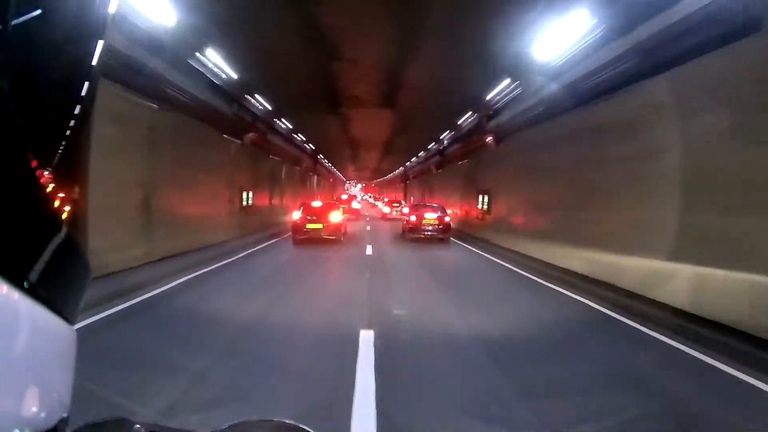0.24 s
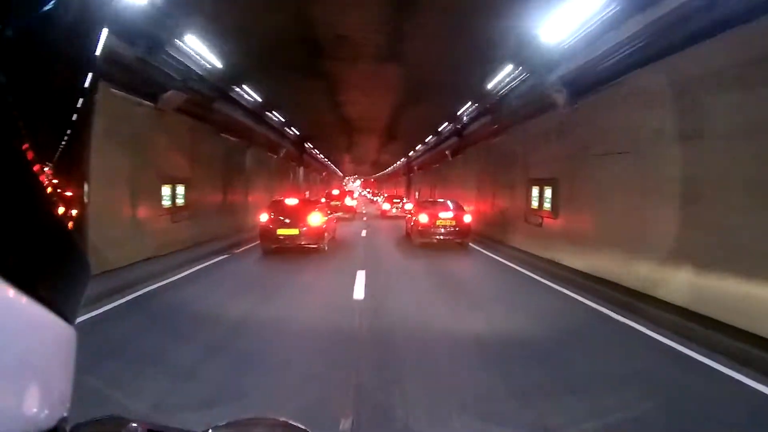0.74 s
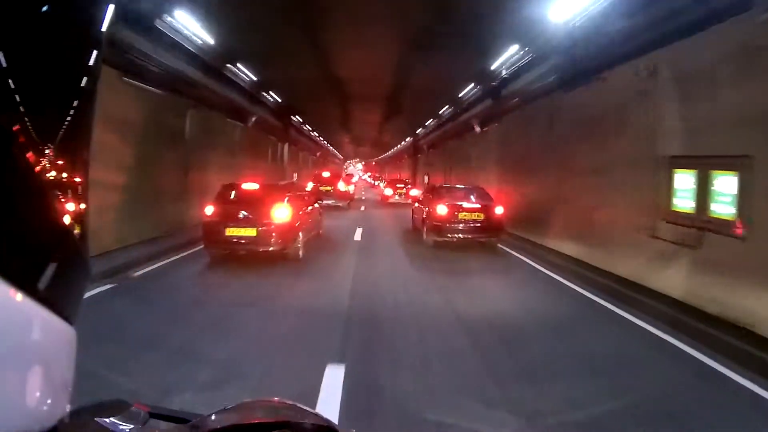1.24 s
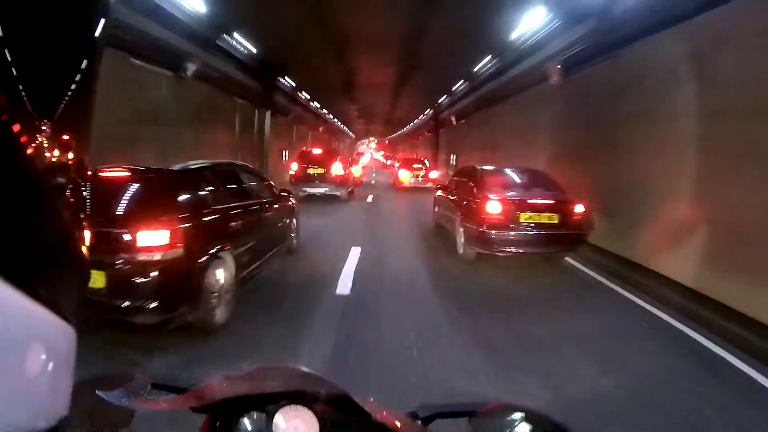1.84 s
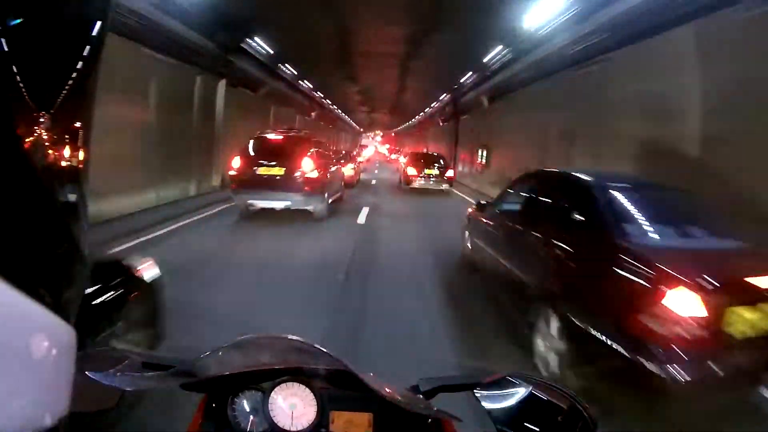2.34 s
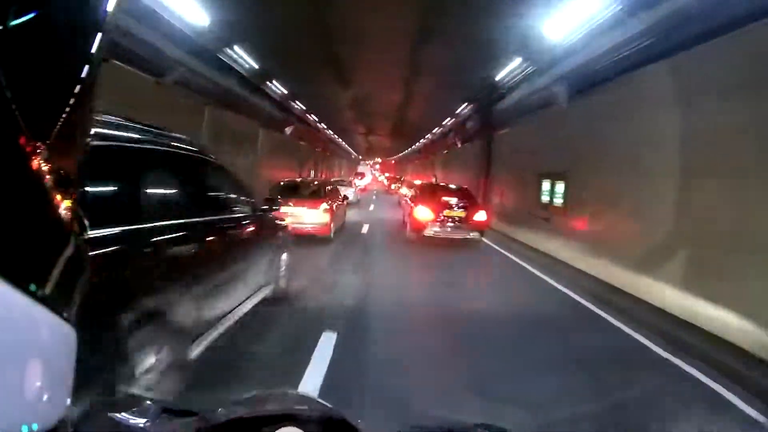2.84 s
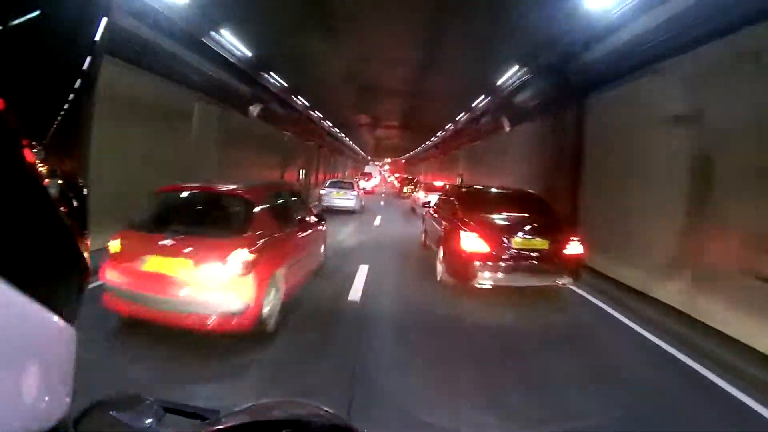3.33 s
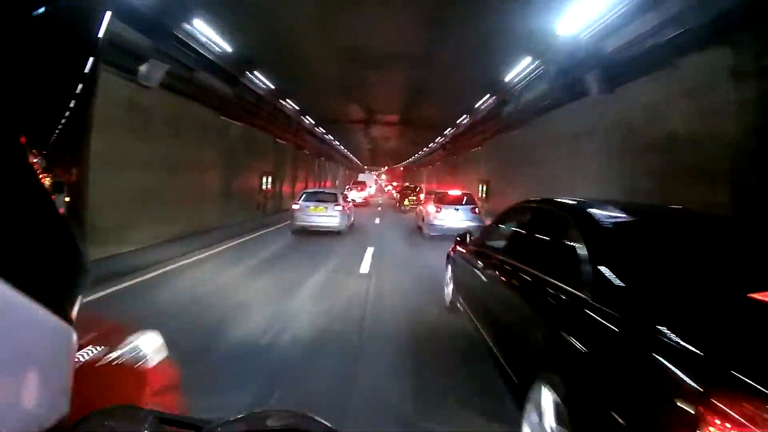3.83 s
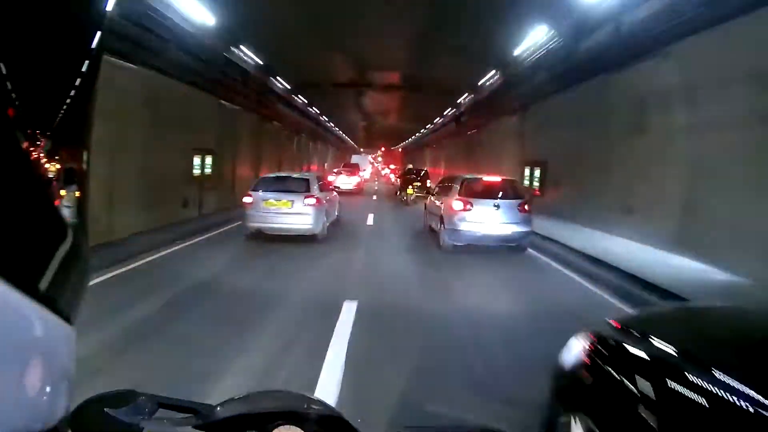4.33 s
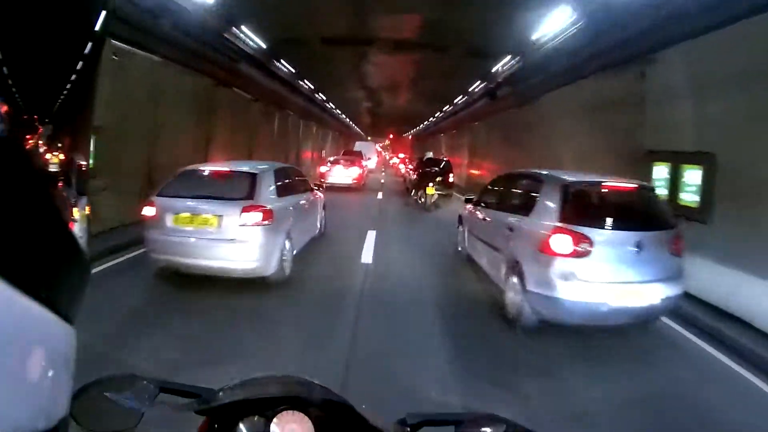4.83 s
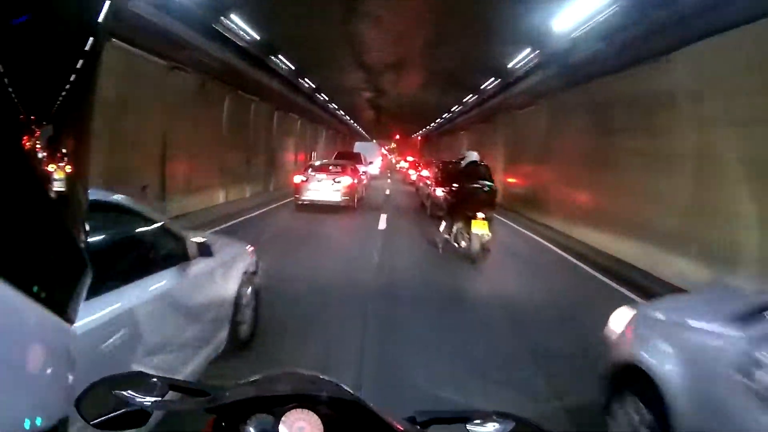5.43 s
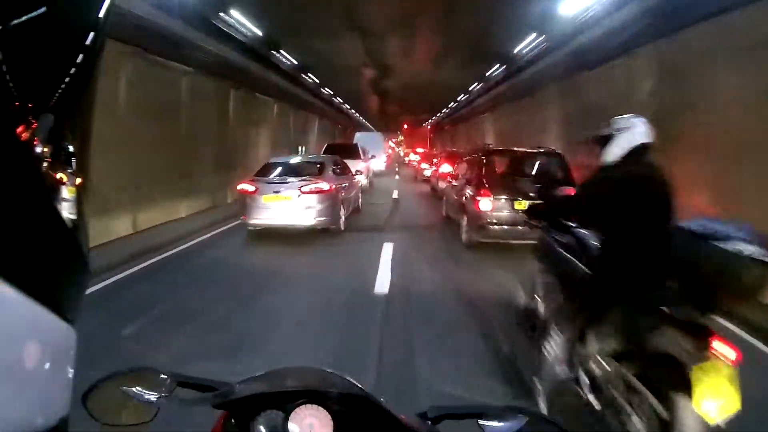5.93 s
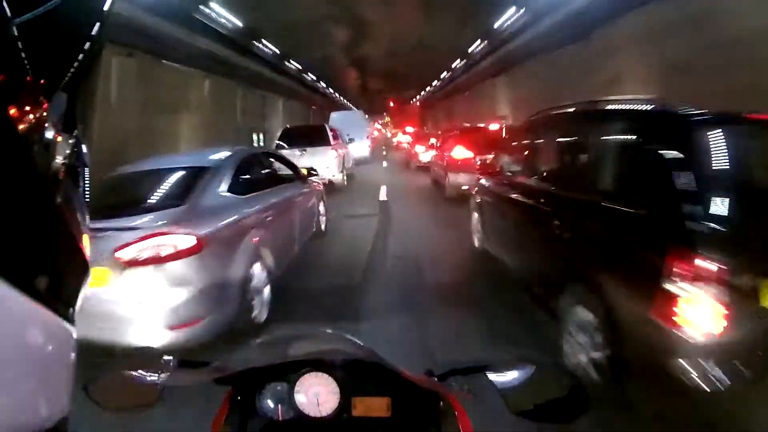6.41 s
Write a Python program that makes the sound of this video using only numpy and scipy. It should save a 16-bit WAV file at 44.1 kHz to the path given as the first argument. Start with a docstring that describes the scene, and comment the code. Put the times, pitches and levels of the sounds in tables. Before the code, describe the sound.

Inside a concrete road tunnel, a motorcycle engine booms and slowly drops in pitch, heard close from the saddle. It accelerates briefly with a rough growl, lets out a few exhaust pops, and winds down for the rest of the time. Around it is a steady roar of traffic, with whooshes of tyre hiss as cars are passed. A thin, wandering whine and faint brake squeals sit underneath.

```python
"""Motorcycle in a road tunnel

A four-cylinder sport bike filters between slow cars, heard from the rider's seat. It coasts, takes one
burst of throttle, pops and burbles as the throttle shuts, and runs down again. The firings boom from the
tail pipe and ring the airbox; concrete walls smear the note. Around it traffic roars, tyres hiss past,
the chain hisses, a thin whine wanders and a brake squeals faintly, early on and again at the end."""
import sys
import numpy as np
from scipy import signal
from scipy.fft import rfft, irfft
from scipy.io import wavfile

SR = 44100
rng = np.random.default_rng(int(sys.argv[2]) if len(sys.argv) > 2 else 0)


def transcribe(signal):
    """Save signal, clipped to [-1, 1], as a 16-bit WAV file at the path in sys.argv[1]."""
    frames = np.atleast_2d(signal).T
    limited = np.clip(frames, -1, 1)
    pcm = np.round(limited * 32767).astype(np.int16)
    wavfile.write(sys.argv[1], SR, pcm)


N = 294147


def from_db(db):
    """Decibels to gain."""
    return 10 ** (np.asarray(db) / 20)


def rms_one(x):
    """Scale to unit power."""
    return x / np.sqrt(np.mean(x ** 2) + 1e-20)


def in_time(rows):
    """Each column of an automation table, sample by sample."""
    times, *columns = np.transpose(rows)
    return [np.interp(np.arange(N) / SR, times, column) for column in columns]


def drift(rate_hz):
    """Smooth random wander with spread 1."""
    hop, settle = 40, 2000
    pole = np.exp(-2 * np.pi * rate_hz * hop / SR)
    noise = rng.standard_normal(N // hop + settle + 2)
    slow = signal.lfilter([1], [1, -2 * pole, pole * pole], noise)[settle:]
    return np.interp(np.arange(N) / hop, np.arange(len(slow)), rms_one(slow))


def swell(start_s, end_s, rise_s, fade_s):
    """Envelope: straight rise, hold, exponential fade; 0-1."""
    t = np.arange(N) / SR
    return np.clip((t - start_s) / rise_s, 0, 1) * np.exp(-np.maximum(t - end_s, 0) / fade_s)


def going_by(closest_s, half_s):
    """Pass-by envelope, 0-1: half gain at half_s either side of the closest point."""
    return 1 / (1 + ((np.arange(N) / SR - closest_s) / half_s) ** 2)


def coloured_noise(spectrum):
    """Noise through an EQ curve, rolled off beyond its ends; rms 1."""
    hz, level_db = np.transpose(spectrum)
    bins = np.maximum(np.arange(N // 2 + 1) * SR / N, 1)
    roll_off = 1 / np.sqrt((1 + (hz[0] / bins) ** 4) * (1 + (bins / hz[-1]) ** 4))
    gain = roll_off * from_db(np.interp(np.log(bins), np.log(hz), level_db))
    return rms_one(irfft(rfft(rng.standard_normal(N)) * gain, N))


def resonate(x, modes):
    """Parallel resonances with alternating polarity."""
    out = 0
    for k, (hz, width_hz, level_db) in enumerate(modes):
        r = np.exp(-np.pi * width_hz / SR)
        poles = [1, -2 * r * np.cos(2 * np.pi * hz / SR), r * r]
        ring = (1 - r * r) / 2 * signal.lfilter([1, 0, -1], poles, x)
        out += (-1) ** k * from_db(level_db) * ring
    return out


def band(x, low_hz, high_hz):
    """Second-order band-pass."""
    return signal.sosfilt(signal.butter(2, [low_hz, high_hz], "band", fs=SR, output="sos"), x)


def tunnel(x, wet_db, t60_s=3.3, predelay_s=.015):
    """Equal-power mix of direct sound and the long, dense tail between concrete walls."""
    t = np.arange(2 * SR) / SR
    tail = rng.standard_normal(len(t)) * from_db(-60 * t / t60_s) * (t > predelay_s)
    eased_in = x * np.minimum(np.arange(N) / (.01 * SR), 1)
    reverb = signal.fftconvolve(eased_in, tail / np.linalg.norm(tail))[:N]
    return (x + from_db(wet_db) * reverb) / np.hypot(1, from_db(wet_db))


def firings(cycles, cylinder_db, rough_db):
    """One click per firing, cylinder by cylinder; no two burns are alike."""
    at = np.flatnonzero(np.diff(np.floor(cycles)) > 0)
    clicks = np.zeros(N)
    clicks[at] = from_db(np.resize(cylinder_db, len(at)) + rough_db * rng.standard_normal(len(at)))
    return clicks


def partial(cycles, order, flutter):
    """One harmonic at a random phase; flutter roughens the tone without making it louder; rms 1."""
    wobble = (1 + flutter * (drift(15) + 1j * drift(23))) / np.sqrt(1 + 2 * flutter ** 2)
    return rms_one(np.real(wobble * np.exp(2j * np.pi * (order * cycles + rng.random()))))


# The revs: (time [s], firing rate [Hz])
REVS = [(0, 119.5), (.13, 119), (.3, 114.8), (.55, 111.3), (.8, 106.8), (1.2, 103.5), (1.45, 99),
        (1.66, 97), (1.8, 100.5), (2, 103.5), (2.1, 109), (2.22, 115.5), (2.4, 131.5), (2.52, 135),
        (2.8, 134.5), (3.05, 131.3), (3.5, 125.3), (4, 118.8), (4.5, 109.5), (4.8, 105), (5.2, 101.3),
        (5.55, 98.5), (5.9, 95.5), (6.25, 94), (6.67, 93.6)]

def firing_hz():
    """Firings per second as the engine runs down and picks up."""
    return in_time(REVS)[0]


def with_revs(level_db, db_per_octave, cruise_hz=110):
    """Gain that rides the revs and equals level_db at cruise."""
    return from_db(level_db + db_per_octave * np.log2(firing_hz() / cruise_hz))


def flow():
    """Intake turbulence grows steeply with the revs; 0-1."""
    return (firing_hz() / firing_hz().max()) ** 3


# Twists of the grip: (opens [s], shuts [s], opening [dB])
TWISTS = [(1.689, 2.486, 0.5), (6.215, 6.672, -13)]

def throttle():
    """How far the throttle is open: 0 shut, about 1 wide open."""
    return sum(from_db(db) * swell(opens, shuts, rise_s=.33, fade_s=.087) for opens, shuts, db in TWISTS)


def load():
    """How hard the engine works, about 0-1."""
    return throttle() * flow()


# Gusts behind a tall car: (time [s], half length [s], level [dB])
WAKE_GUSTS = [(2.82, .055, -38.5), (2.981, .03, -42.5)]

def wind(bed_db=-54):
    """Low, lumpy buffeting, strongest in the wake of a tall car."""
    gusts = sum(from_db(db) * going_by(s, half_s) for s, half_s, db in WAKE_GUSTS)
    return np.hypot(from_db(bed_db), gusts) * rms_one(band(rng.standard_normal(N), 33.7, 64.6))


# Pass-bys: (closest [s], half length [s], tyre hiss [dB], roar [dB])
PASS_BYS = [(.1, 0.19, -67, -42.5), (2.417, .22, -67, -35), (2.73, 0.031, -63.5, -35.5),
            (2.86, 0.067, -67, -39), (3.986, .06, -66.5, -41), (4.24, 0.11, -66.5, -43),
            (4.45, 0.11, -67.5, -42.5), (5.44, 0.075, -71.5, -52), (5.6, 0.07, -70.5, -46),
            (6.108, 0.044, -76, -40), (6.244, 0.064, -73, -61)]

def passing():
    """Hiss and roar envelopes of all the vehicles going by, one a motorbike; their powers add."""
    powers = sum(np.outer(from_db([hiss_db, roar_db]), going_by(s, half_s)) ** 2
                 for s, half_s, hiss_db, roar_db in PASS_BYS)
    return np.sqrt(powers)


# Tone of the traffic and air bed: (frequency [Hz], gain [dB])
ROAR_EQ = [(30, 3), (60, -32.5), (100, 11), (170, -1), (300, 0.5), (450, 0.5), (700, -2.5), (1000, -5.5),
           (1350, -7), (1650, -8), (2000, -10), (2400, -21.5), (3200, -28), (6000, -46.5)]
# Tone of the bike's tyres: (frequency [Hz], gain [dB])
OWN_TYRE_EQ = [(2500, -3.5), (4200, 10), (5600, 12.5), (7000, 6), (8000, 11.5), (9000, -3.5), (10400, -0.5),
               (11500, -23), (13000, -13)]
# Tone of passing tyres: (frequency [Hz], gain [dB])
CAR_TYRE_EQ = [(2500, -6.5), (4200, 13), (5600, 17), (7000, 6.5), (8000, 8.5), (9000, -3.5), (10400, 2),
               (11500, -16.5), (13000, -20)]

def traffic(passing_hiss, passing_roar):
    """Cars and rushing air fill the tunnel with roar and a thin drone; tyres hiss as each vehicle goes by."""
    roar = np.hypot(with_revs(-39.5, db_per_octave=8), passing_roar) * coloured_noise(ROAR_EQ)
    drone = from_db(-56) * rms_one(resonate(rng.standard_normal(N), [(1627, 24, 0)]))
    own_tyres = with_revs(-79, db_per_octave=4.5) * coloured_noise(OWN_TYRE_EQ)
    car_tyres = passing_hiss * coloured_noise(CAR_TYRE_EQ)
    return roar + drone + from_db(.6 * drift(15)) * (own_tyres + car_tyres)


def tread(pitch_hz=1910, level_db=-48):
    """The tread of one passing car sings in a narrow band."""
    ring = band(rng.standard_normal(N), .92 * pitch_hz, 1.08 * pitch_hz)
    return from_db(level_db) * going_by(closest_s=4.32, half_s=.093) * rms_one(ring)


# Ring of the brake disc: (frequency [x pitch], width [Hz], gain [dB])
DISC_MODES = [(0.999, 49.8, 4.5), (1.04, 140.4, -9.5)]
# Ringing cues: (start [s], end [s], pitch [Hz], level [dB]); the first rings along with the whine near 4.26
# kHz, the later two are brake squeals
RING_CUES = [(1.1, 1.62, 4260, -75), (1.65, 1.92, 6000, -82), (5.95, 6.682, 6150, -72)]

def brake(flutter_db=2.5):
    """A pad grips unevenly and rubs the disc into a thin, wavering squeal; early on the same ring adds a tone
    beside the whine."""
    squeal = 0
    for start, end, hz, db in RING_CUES:
        modes = [(ratio * hz, width_hz, gain_db) for ratio, width_hz, gain_db in DISC_MODES]
        ring = band(resonate(rng.standard_normal(N), modes), .79 * hz, 1.2 * hz)
        squeal += from_db(db) * swell(start, end, rise_s=.36, fade_s=.2) * rms_one(ring)
    return squeal * from_db(flutter_db * drift(14))


# Bodywork tick: (time [s], level [dB])
BODY_TICKS = [(6.2274, -69)]

def rattle(decay_s=.007):
    """A short, bright tick of loose bodywork."""
    t = np.arange(N) / SR
    envelope = sum(from_db(db) * (t >= s) * np.exp(-np.abs(t - s) / decay_s) for s, db in BODY_TICKS)
    return envelope * rms_one(band(rng.standard_normal(N), 5500, 10500))


# Glide of the whine: (time [s], pitch [Hz], level [dB])
WHINE_GLIDE = [(0, 3945, -67), (.4, 3985, -77), (.9, 4150, -72), (1.4, 4267, -71), (1.85, 4190, -77),
               (2.4, 4080, -63), (2.7, 3900, -68), (3.2, 3790, -67), (3.7, 3600, -67), (4.15, 3370, -68.5),
               (4.5, 3310, -82.5)]

def whine(pitch_blur=.012):
    """A thin, blurred whine, as of a drive train; it wanders, then sinks as the bike slows."""
    hz, level_db = in_time(WHINE_GLIDE)
    cycles = np.cumsum(hz * (1 + pitch_blur * drift(110))) / SR
    return from_db(level_db) * partial(cycles, order=1, flutter=.8)


# Chain fader, dipping where the throttle takes up the slack: (time [s], level [dB])
CHAIN_FADER = [(0, -57), (.17, -56.5), (.3, -61), (.45, -66), (.8, -62), (1.55, -65.5), (1.75, -68.5),
               (1.95, -69), (2.3, -55), (2.6, -59.5), (3.1, -61.5), (4, -59.5), (4.5, -61), (5.1, -62),
               (5.4, -66.5), (6.67, -66.5)]
# Ring of chain and sprockets: (frequency [Hz], width [Hz], gain [dB])
CHAIN_MODES = [(3523, 300, 0), (3980, 240, 0.5), (4280, 160, -1)]

def chain():
    """Rollers running onto the sprockets ring them into a diffuse hiss."""
    level_db, = in_time(CHAIN_FADER)
    ring = band(resonate(rng.standard_normal(N), CHAIN_MODES), 3220, 4600)
    return from_db(level_db + 1.1 * drift(12)) * rms_one(ring)


# Tone of the valve clatter: (frequency [Hz], gain [dB])
VALVE_EQ = [(1200, -14), (2200, 2.5), (2700, 4.5), (3200, -3.5), (4000, -11), (4600, -6), (5500, -11.5),
            (6500, -20), (9000, -41)]

def valves(cycles, passing_hiss):
    """Valve clatter pulses with the firings and bounces back off the sides of passing vehicles."""
    thrown_back = from_db(11.5) * passing_hiss
    gain = np.hypot(with_revs(-57.5, db_per_octave=4.5), thrown_back)
    pulse = 1 + .089 * np.cos(2 * np.pi * cycles)
    return gain * coloured_noise(VALVE_EQ) * pulse * from_db(.47 * drift(10))


# Spells of uneven firing: (start [s], end [s], level [dB])
SPUTTER_CUES = [(1.657, 1.732, -43), (2.641, 2.668, -33.5), (2.779, 2.905, -32.5), (5.129, 5.277, -42)]
# Body of the silencer: (frequency [Hz], width [Hz], gain [dB])
SILENCER_MODES = [(115, 33, 3), (274, 92, -2.5), (400, 73, -9), (683, 47, -12.5)]
# Pops in the silencer: (time [s], peak [dB])
POP_CUES = [(2.65, -19.5), (2.804, -16.5), (2.846, -16)]
# Ring of one pop: (frequency [Hz], width [Hz], gain [dB])
POP_MODES = [(285, 69, -1.5), (387, 64, -1.5), (605, 150, -18.5)]

def overrun(cycles, idle_db=-49.5, throttle_db=-42.5):
    """Ragged burns burble in the silencer, and a few pops thump after the throttle shuts."""
    spells = sum(from_db(db) * swell(start, end, rise_s=.036, fade_s=.16)
                 for start, end, db in SPUTTER_CUES)
    level = from_db(idle_db) + np.hypot(spells, from_db(throttle_db) * throttle())
    burns = firings(cycles, cylinder_db=[0], rough_db=3) * rng.standard_normal(N)
    burble = level * rms_one(band(resonate(burns, SILENCER_MODES), 64, 770))
    pop = band(resonate(signal.unit_impulse(SR // 10), POP_MODES), 204, 720)
    for s, peak_db in POP_CUES:
        start = round(s * SR)
        burble[start:start + len(pop)] += from_db(peak_db) * pop / np.abs(pop).max()
    return tunnel(burble, wet_db=-8)


# Body of the airbox: (frequency [Hz], width [Hz], gain [dB])
AIRBOX_MODES = [(368, 100, 7), (444, 160, 3.5), (560, 36, -1), (720, 72, -0.5), (1420, 88, -18.5)]
# Formants of the inlet ducts: (frequency [Hz], width [Hz], gain [dB])
INLET_MODES = [(554, 73, 7.5), (810, 390, -4.5), (1550, 420, -7)]

def intake(cycles, idle_db=-67, load_db=-32):
    """Gulps from four unequal cylinders ring the airbox into a growl; at full flow the air roars."""
    level = from_db(idle_db) + from_db(load_db) * load()
    jitter = .022 * load() * drift(40)
    gulps = firings(cycles + jitter, cylinder_db=[5, -2, 2, -3], rough_db=2.2)
    growl = rms_one(band(resonate(gulps, AIRBOX_MODES), 293, 1130))
    breathing = 1 + .5 * np.cos(np.pi * cycles)
    rush = rms_one(resonate(rng.standard_normal(N), INLET_MODES)) * breathing
    roar = from_db(-.7) * level * flow() * band(rush, 460, 2080)
    return tunnel(level * growl, wet_db=0) + roar


# Rasp fader: (time [s], level [dB])
RASP_FADER = [(0, -48), (1.4, -48.5), (1.8, -58.5), (2.2, -42.5), (3, -55.5), (3.8, -51.5), (4.55, -44),
              (5.6, -58), (6.67, -69)]
# The engine's top harmonics: (order [x firing rate], gain [dB])
RASP_ORDERS = [(8, -2.5), (9, -5), (10, -5.5), (11, -6), (12, -8.5), (13, -8), (14, -10.5), (15, -9),
               (17, -11.5)]
# Ring of the casing, which they slide through: (frequency [Hz], width [Hz], gain [dB])
CASING_MODES = [(1111, 40, -3)]

def rasp(cycles):
    """Top harmonics straight off the engine; each swells and fades on its own, and load adds grit."""
    level_db, = in_time(RASP_FADER)
    flutter = .5 + 1.4 * load()
    tones = sum(from_db(db + 2 * drift(4)) * partial(cycles, order, flutter) for order, db in RASP_ORDERS)
    return tunnel(from_db(level_db) * rms_one(tones + resonate(tones, CASING_MODES)), wet_db=-5.5)


# Boom at the firing rate, throbbing between the walls: (time [s], level [dB])
BOOM_FADER = [(0.0, -25.5), (0.07, -22.5), (0.11, -45.5), (0.13, -28), (0.2, -22.5), (0.24, -30.5),
              (0.46, -24.5), (0.54, -33), (0.59, -23.5), (0.78, -32), (0.91, -22), (1.02, -30.5),
              (1.09, -22.5), (1.15, -22.5), (1.21, -38), (1.26, -23.5), (1.3, -37), (1.39, -23),
              (1.43, -19.5), (1.49, -30), (1.54, -20.5), (1.63, -29.5), (1.69, -51), (1.73, -32),
              (1.86, -27.5), (1.91, -60), (1.95, -34), (2.23, -17.5), (2.36, -27), (2.43, -20),
              (2.62, -31.5), (2.65, -19), (2.75, -36), (2.79, -17), (2.82, -27), (3.03, -32), (3.07, -21.5),
              (3.16, -32), (3.21, -21.5), (3.55, -24), (3.66, -30.5), (3.79, -21), (3.86, -27),
              (4.01, -24.5), (4.05, -42), (4.1, -26.5), (4.16, -31.5), (4.27, -25), (4.77, -26.5),
              (4.81, -31), (5.0, -23.5), (5.07, -29), (5.11, -39.5), (5.31, -34.5), (5.35, -39.5),
              (5.46, -27.5), (5.54, -39), (5.63, -34), (5.74, -39), (6.67, -36.5)]
# The octave above the boom: (time [s], relative level [dB])
OCTAVE_FADER = [(0, -29), (.15, -28), (.23, -44.5), (.42, -50.5), (.55, -29.5), (.75, -35.5), (.81, -32.5),
                (.87, -33), (1, -39.5), (1.15, -38), (1.3, -38.5), (1.85, -44.5), (1.95, -35),
                (2.07, -30.5), (2.12, -47), (2.25, -26.5), (2.32, -35.5), (2.4, -30.5), (2.48, -20),
                (2.53, -50), (2.72, -36), (2.85, -30.5), (2.98, -33.5), (3.05, -37), (3.25, -31),
                (3.44, -47), (3.6, -29), (3.78, -30.5), (4, -34), (4.2, -48), (4.3, -30.5), (4.6, -36.5),
                (4.88, -41), (5.02, -40.5), (5.22, -44.5), (5.55, -40), (5.8, -56.5), (6.67, -47.5)]
# Ride on all the overtones: (time [s], trim [dB])
OVERTONE_TRIM = [(0, 0), (.8, 2), (1.5, -0.5), (2.4, 1.5), (3.1, -3.5), (3.8, 2), (4.45, 2), (5.1, 2),
                 (5.55, -3), (6.2, -2), (6.67, -4)]
# Exhaust overtones: (order [x firing rate], coasting gain [dB], part added by throttle [dB re coasting],
# share of the octave's swing [0-1], flutter [ratio])
EXHAUST_ORDERS = [(3, -1, 12, .2, .2), (4, -4.5, 13, .1, 0.17), (5, -5, 12.5, .05, 0.18),
                  (6, -3.5, 2.5, .2, .22), (7, -11.5, 0.5, .2, .29)]
# Response of the tail pipe: (frequency [Hz], gain [dB])
PIPE_EQ = [(270, -54), (292, -43.5), (308, -46), (320, -40), (338, -35.5), (362, -40), (382, -41),
           (405, -44.5), (430, -44), (458, -40), (474, -46.5), (500, -49.5), (535, -49.5), (565, -51.5),
           (590, -52.5), (625, -50), (665, -47), (705, -51.5), (750, -55), (790, -51), (900, -58)]

def exhaust(cycles, fading_db=2.5, throttle_flutter=.25):
    """The tail pipe booms; overtones slide through its resonances and turn loud and rough on throttle."""
    boom_db, = in_time(BOOM_FADER)
    octave_db, = in_time(OCTAVE_FADER)
    trim_db, = in_time(OVERTONE_TRIM)
    swing_db = octave_db - octave_db.mean()
    opening = throttle()
    boom = from_db(boom_db) * partial(cycles, order=1, flutter=.09)
    octave = from_db(octave_db + 1.5) * partial(cycles, order=2, flutter=.18)
    overtones = 0
    for order, coasting_db, added_db, share, flutter in EXHAUST_ORDERS:
        pipe_db = np.interp(order * firing_hz(), *np.transpose(PIPE_EQ))
        gain = from_db(trim_db + pipe_db + coasting_db + share * swing_db)
        push = 1 + from_db(added_db) * opening
        fading = from_db(fading_db * drift(4))  # each waxes and wanes between the walls
        overtones += gain * push * fading * partial(cycles, order, flutter + throttle_flutter * opening)
    return tunnel(boom, wet_db=-22) + tunnel(octave, wet_db=-9) + tunnel(overtones, wet_db=-7)


def scene():
    """Mono mix of bike and road; all engine layers follow the same crank."""
    cycles = np.cumsum(firing_hz() * (1 + .0015 * drift(10))) / SR  # one cycle per firing
    hiss, roar = passing()
    engine = exhaust(cycles) + rasp(cycles) + intake(cycles) + overrun(cycles)
    bike = engine + valves(cycles, hiss) + chain() + whine() + rattle()
    return (bike + traffic(hiss, roar) + tread() + brake() + wind())[None]


def record(dry, cutoff_hz=12800):
    """A steep low-pass takes the top off the mix."""
    return signal.sosfilt(signal.ellip(10, .1, 80, cutoff_hz, fs=SR, output="sos"), dry)


dry = scene()
out = record(dry)
transcribe(out)
```